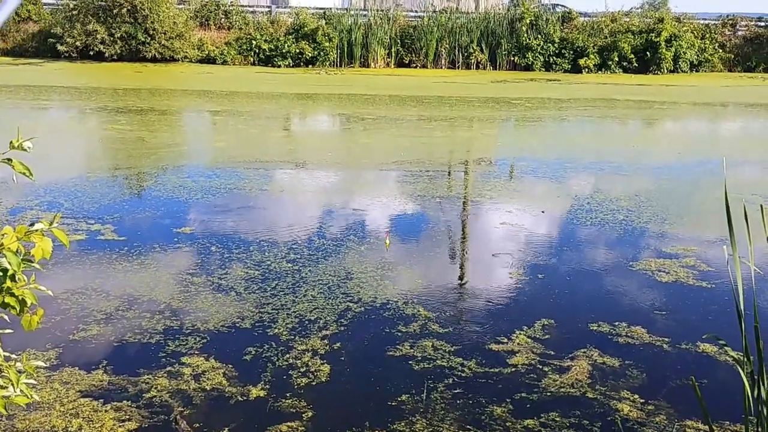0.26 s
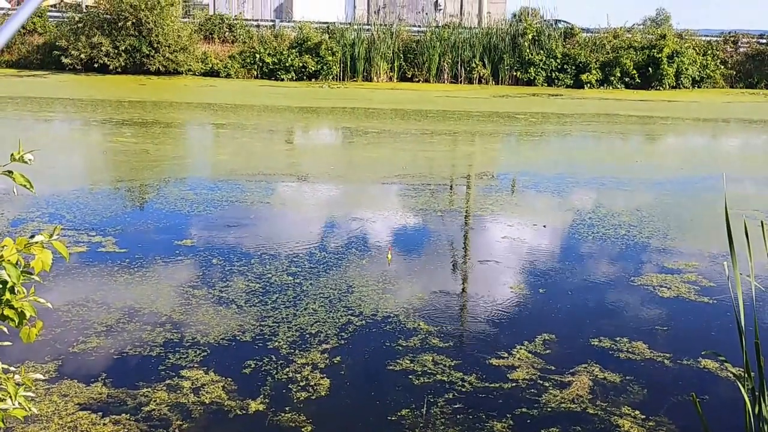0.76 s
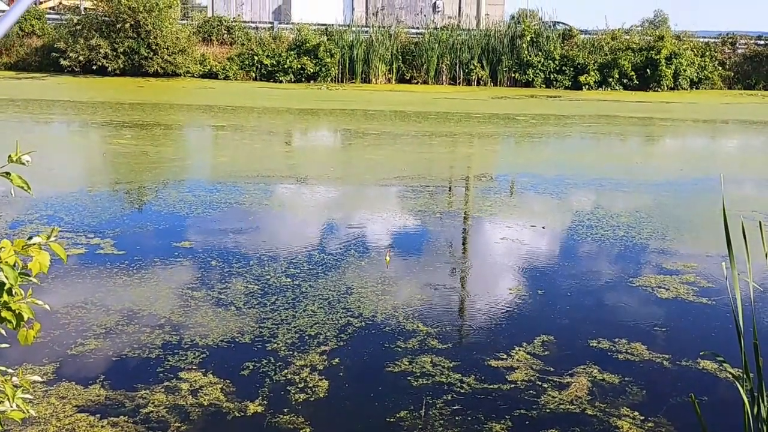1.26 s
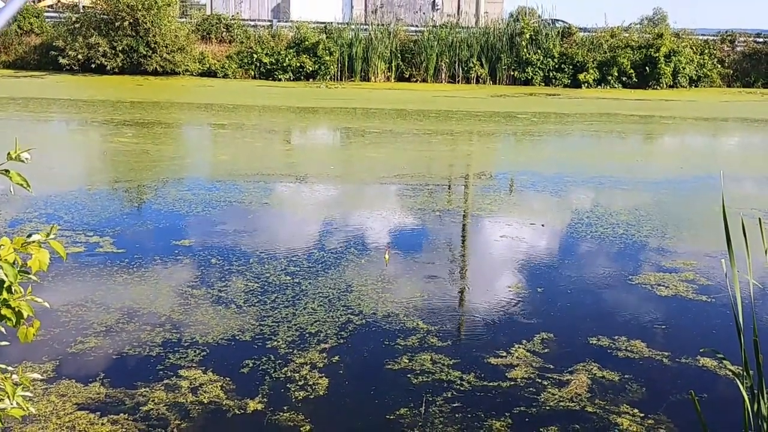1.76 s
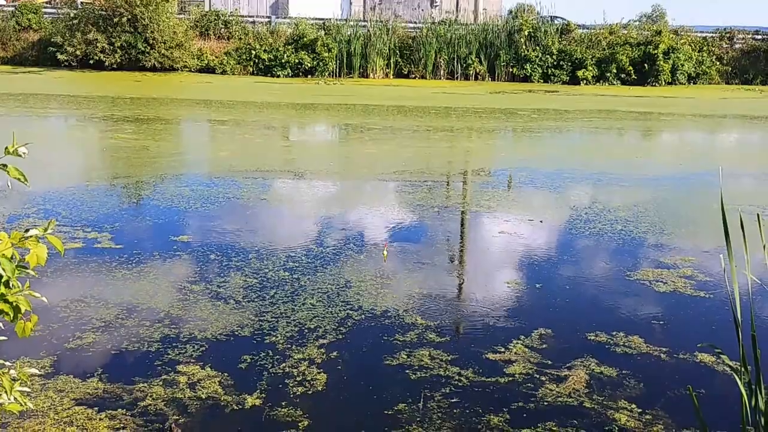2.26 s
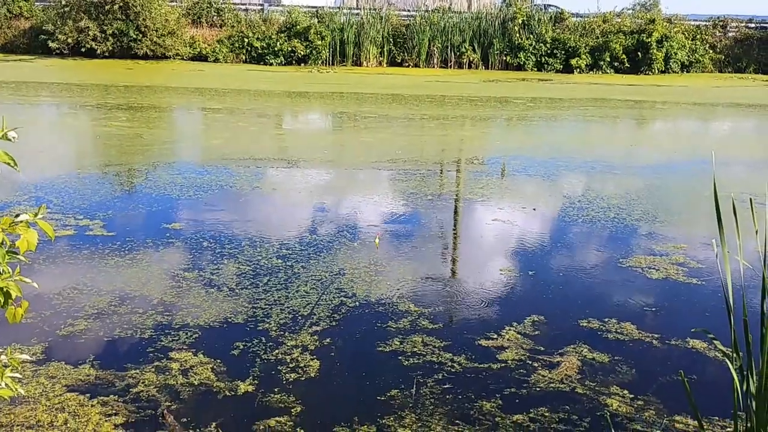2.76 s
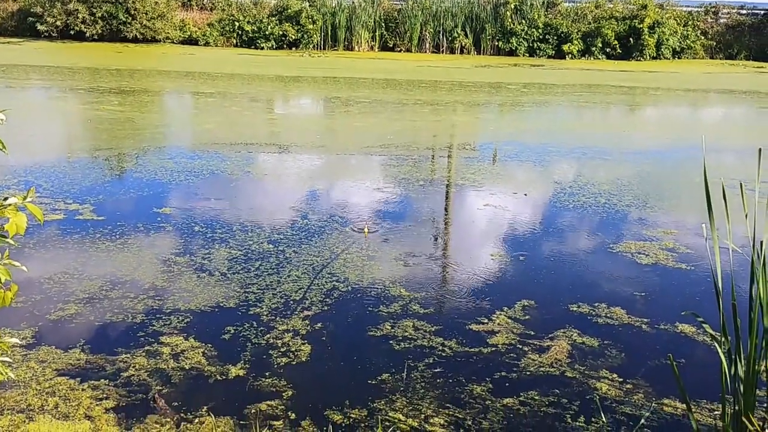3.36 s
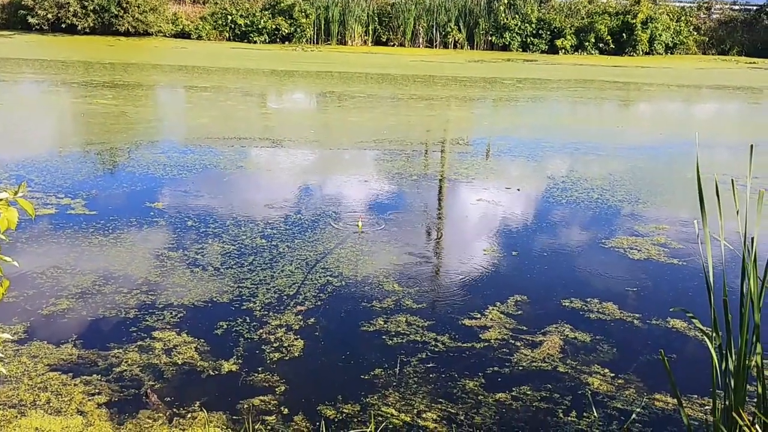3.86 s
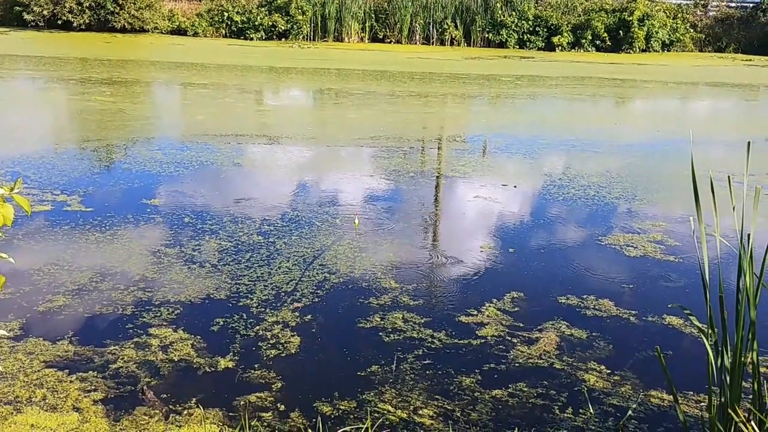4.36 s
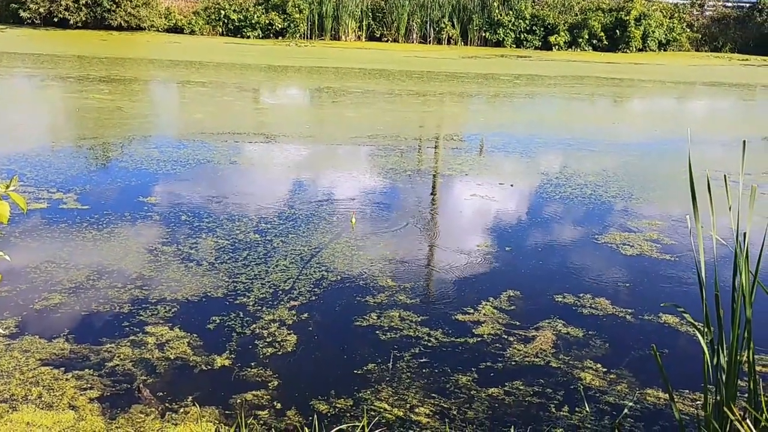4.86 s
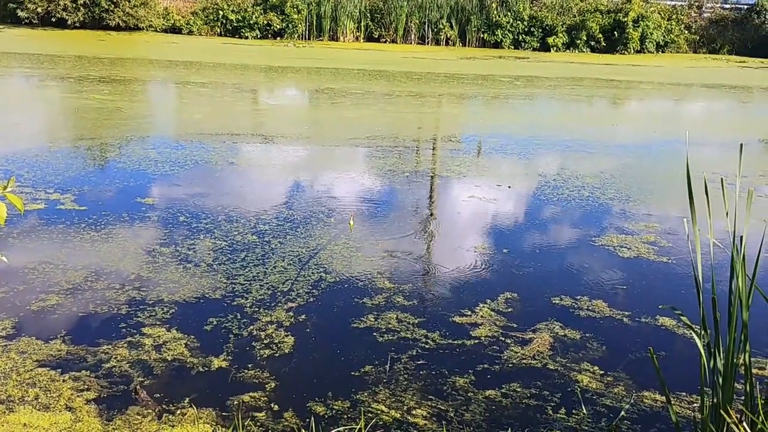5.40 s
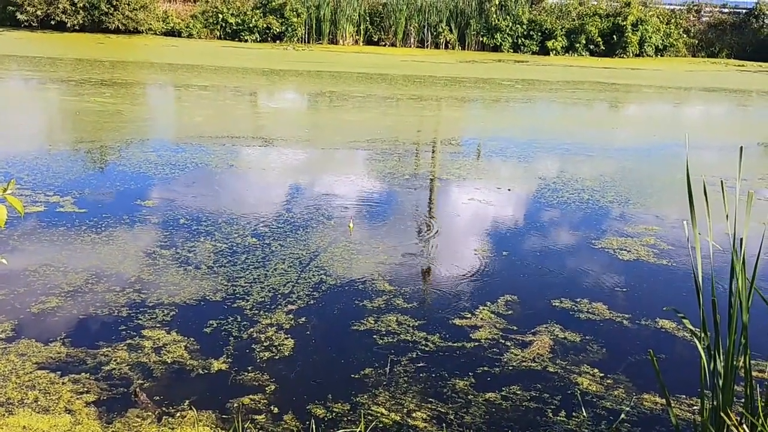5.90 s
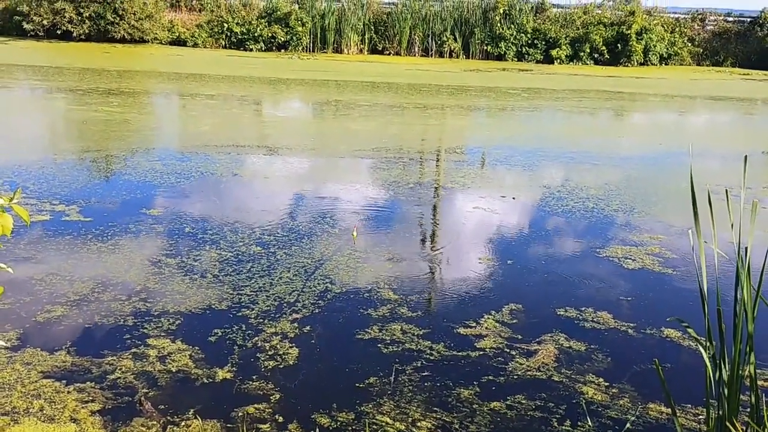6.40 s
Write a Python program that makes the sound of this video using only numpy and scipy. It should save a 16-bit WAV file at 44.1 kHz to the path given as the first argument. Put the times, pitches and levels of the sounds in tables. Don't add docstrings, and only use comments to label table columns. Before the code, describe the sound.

Steady low rumble and tyre roar of distant traffic across a pond, lorry engines humming, while a thin cicada buzz fades away and a bird chips.

```python
import sys
import numpy as np
from scipy import signal
from scipy.fft import rfft, irfft
from scipy.io import wavfile
from scipy.ndimage import uniform_filter1d

SR = 44100
rng = np.random.default_rng(int(sys.argv[2]) if len(sys.argv) > 2 else 0)


def materialize(psi):
    bounded = np.clip(np.atleast_2d(psi).T, -1, 1)
    quanta = np.round(bounded * 32767).astype(np.int16)
    wavfile.write(sys.argv[1], SR, quanta)


def amplitude_ratio(level_db):
    exponent = np.asarray(level_db, float) / 20
    return 10 ** exponent


N = 292821

# [t/s, tyre roar level/dB]
TRAFFIC = [(0, -56), (.15, -53.5), (.4, -55.5), (.95, -54.5), (1.5, -55), (1.9, -55.5), (2.07, -53.5),
           (2.5, -55), (2.6, -53), (3.05, -57), (3.4, -55.5), (4.1, -53.5), (4.33, -55.5), (4.75, -56.5),
           (5.1, -54.5), (5.5, -54.5), (6.1, -55.5), (6.64, -57.5)]
# [t/s, length/s, change of level/dB]
SURGES = [(0.09, 0.1, 2), (1.396, 0.32, 2), (2.192, .4, 0), (2.631, 0.17, 2.5), (2.895, 0.11, 1.5),
          (3.1, 0.23, -1), (3.9, 0.44, -2), (5.105, 0.078, 3), (5.39, 0.25, 2), (6.05, 0.41, 1.5),
          (6.64, 0.094, 9)]
# [f/Hz, level/dB per Hz]
RUMBLE = [(25, -45.5), (43, -28.5), (55, 5), (90, 6), (130, 5), (170, 0), (250, -7), (330, -19), (450, -43),
          (800, -110)]
# [f/Hz, level/dB per Hz]
ROAR = [(180, -20.5), (300, -2.5), (428, -11.5), (493, -8.5), (764, -9), (965, -12.5), (1940, -25.5),
        (2400, -29.5), (3100, -38.5), (4420, -72)]
# [f/Hz, level/dB per Hz]
HISS = [(1800, -14), (2600, -1), (3500, -1), (5000, -3), (6500, -7.5), (8400, -8.5), (9000, -11.5),
        (10400, -14.5), (12800, -11.5), (14500, -11), (15200, -6), (15700, -3)]
# [f/Hz, likeness/0..1]
LIKENESS = [(60, .99), (150, .95), (350, .87), (600, .78), (1100, .58), (1700, .48), (2300, .3),
            (3500, .12), (6000, .03)]
# [f/Hz, L-R level/dB]
LEAN = [(60, 5), (400, 5.2), (1000, 4.5), (2500, 3.9), (5000, 3.8), (9000, 3.5), (15000, 4.2)]
# [t/s, firing f/Hz, level/dB, exhaust boom: second order over first/dB]
CRUISER = [(0, 58.6, -35, 2.5), (.55, 59, -36.5, 5.5), (.98, 59.1, -36, -1.5), (1.14, 59.2, -33, -17),
           (1.33, 59.3, -37.5, 4.5), (1.75, 59.5, -33, -2.5), (2.148, 59.8, -30, -1),
           (2.68, 59.7, -34, -3.5), (3.201, 58.5, -41, -8)]
# [t/s, firing f/Hz, level/dB]
SHIFTER = [(3.25, 59, -41), (3.6, 61.88, -43), (3.96, 63.8, -37), (4.3, 68.14, -32), (4.7, 70.47, -34.5),
           (5.01, 70.56, -31), (5.2, 64.4, -37), (5.49, 54.9, -44.5), (5.65, 56, -45)]
# [t/s, firing f/Hz, level/dB]
CLIMBER = [(3.099, 135.8, -46.5), (3.22, 134.9, -38.5), (3.38, 130.9, -29.5), (3.6, 131.3, -28),
           (4.15, 134, -27.5), (4.3, 135.1, -31.5), (4.6, 137.8, -36), (4.789, 137.6, -33),
           (4.88, 135.5, -48)]
# [t/s, length/s, firing f/Hz at start,
# f/Hz at end, level/dB]
FAR_CARS = [(0.395, 1.8, 126, 135.2, -42), (0.955, 0.34, 88, 90.9, -43.5), (1.25, 1, 80.5, 78.8, -39.5),
            (1.799, 0.98, 93.5, 92.9, -42.5), (2.296, 0.94, 126, 132.2, -45),
            (2.496, 0.15, 270, 266.7, -49.5), (2.726, 0.053, 119.4, 117.6, -33),
            (2.974, .08, 118.3, 115.5, -35.5), (2.723, 0.11, 272, 283, -52),
            (3.396, 1.3, 80.5, 85.54, -40.5), (3.867, .83, 232, 236.8, -51), (4.7, 1.6, 90, 90.74, -47.5),
            (4.88, 0.38, 232, 235, -48.5), (5.017, .14, 140.9, 137.9, -34), (5.22, 0.77, 143.3, 145.1, -43),
            (5.43, 0.76, 232.5, 237, -51.5), (5.527, .6, 252.5, 256.7, -52.5), (5.752, .7, 76, 69.9, -45),
            (5.946, .7, 142, 135.7, -50), (6.097, 0.66, 88, 84.2, -43.5)]
# [t/s, hold/s, level/dB, belly resonance f/Hz, f/Hz above which tymbals oppose]
CICADA = [
    (0, .25, -65.5, 7490, 6400),
    (0.396, .2, -69, 7450, 6400),
    (0.968, 0.097, -72.5, 7480, 6400),
    (1.3, .14, -77.5, 7530, 6450),
    (1.75, 0.089, -72.5, 7370, 7950),
    (2.398, .15, -77.5, 7200, 8000),
    (2.82, .15, -84, 7220, 6800),
    (3.141, .25, -79.5, 7030, 7800),
    (3.554, .35, -80.5, 6450, 7800),
    (4.022, 0.074, -84, 6310, 7800),
]
# [t/s, clicks per second]
CLICKS = [(0, 190.3), (.7, 191.45), (1.5, 191.8), (3.05, 191.45), (3.5, 190.2), (4.2, 188)]
# [f/Hz, level/dB]
TYMBAL = [(4200, -36.5), (5000, -19), (5750, -6), (6300, -10), (7000, -9), (7900, -10), (8500, -18),
          (9200, -27.5), (10000, -43.5)]
# [f/Hz, loss/dB]
SHADE = [(5000, 12), (6300, 14.5), (7000, 20), (7450, 25), (8500, 18)]
# [t/s, level/dB, f/Hz, L-R level/dB, length/s]
CHIPS = [
    (.456, -65, 3720, 6, .035),
    (1.682, -65.5, 3580, 3.5, .032),
    (3.03, -68.5, 3680, 5, .033),
    (5.688, -66, 3650, 2, .034),
]
# [t/s, level/dB, f/Hz, L-R level/dB, length/s]
PEEPS = [
    (4.99, -79, 4300, 6, .08),
    (5.13, -79, 4250, 6, .1),
    (5.94, -75, 4500, 8, .018),
]
# [t/s, level/dB, f/Hz, L-R level/dB, length/s]
TICKS = [
    (2.379, -64, 3000, 5, .007),
    (3.365, -72, 4200, 5, .008),
    (3.43, -67, 6200, 2, .004),
    (3.431, -69, 4000, 2, .004),
    (4.036, -69, 7200, 10, .012),
    (4.188, -73, 7200, 10, .008),
    (3.17, -76, 7000, 6, .008),
]
# [t/s, level/dB, f/Hz, L-R level/dB, length/s]
BUMPS = [
    (2.56, -50, 550, 5.5, .05),
    (3.68, -49, 540, 5.5, .04),
    (5.075, -45, 520, 4.5, .055),
]
# [f/Hz, phase/rad]
BACK = [(60, .14), (130, .1), (250, .3), (400, .3), (800, .22), (1500, .17), (2500, .02)]

RUMBLE_DB, RUMBLE_FOLLOWS, RUMBLE_FADE_DB_PER_S = -45.5, 0.52, 0.23
LEAVES_DB, LEAVES_FADE_DB_PER_S = -82, 0.32
CLIMBER_SECOND_DB = -26
PASS_EDGE_DB, PASS_EDGE_SHARE = -4, 0.21
SWELL_DB_PER_S, SAG_DB_PER_S = 54, 34
RASP, RASP_PER_S = .1, .07
LAG = 21
LOW_CUT_HZ, EDGE_HZ = 35, 15745


def road():
    (roar_db,), _ = played(TRAFFIC)
    t = np.arange(N) / SR
    rumble_db = RUMBLE_DB + RUMBLE_FOLLOWS * (roar_db - roar_db.mean()) - RUMBLE_FADE_DB_PER_S * t
    for start, length, db in SURGES:
        rumble_db = rumble_db + db * np.exp(-(2 * (t - start) / length) ** 2)
    leaves_db = LEAVES_DB - LEAVES_FADE_DB_PER_S * t
    rumble = wash(RUMBLE, (155, 330), rumble_db, patchy_db=1.0, gusty_db=1.0, size=4096)
    roar = wash(ROAR, (400, 1500), roar_db, patchy_db=1.0, gusty_db=0.76, size=1024)
    hiss = wash(HISS, (9500, 15500), leaves_db, patchy_db=1.5, gusty_db=0.05, size=512)
    return rumble + roar + hiss


def wash(spectrum, band_hz, level_db, patchy_db, gusty_db, size):
    hz = np.fft.rfftfreq(size, 1 / SR)
    frames = 4 * N // size + 5
    a, b, c, d, patches = rng.standard_normal((frames, len(hz), 5)).T
    patches = uniform_filter1d(patches, size // 100, axis=0)
    patches = evened(uniform_filter1d(patches, size=6, axis=1))
    gusts = evened(uniform_filter1d(rng.standard_normal(frames), size=3))
    same = np.clip(read(LIKENESS, hz), 0, 1)[:, None]
    left = a + 1j * b
    right = same * left + np.sqrt(1 - same ** 2) * (c + 1j * d)
    weather_db = patchy_db * patches + gusty_db * gusts
    z = np.array([left, right]) * amplitude_ratio(read(spectrum, hz)[:, None] + weather_db)
    z = z * amplitude_ratio(np.array([.5, -.5])[:, None] * read(LEAN, hz))[:, :, None]
    power = abs(z.mean(0)) ** 2
    inside = (hz > band_hz[0]) & (hz < band_hz[1])
    share = np.sum(power[inside]) / np.sum(power)
    x = signal.istft(z, nperseg=size, noverlap=size - size // 4)[1][:, :N]
    return x / np.std(x.mean(0)) / np.sqrt(share) * amplitude_ratio(level_db)


def engine(rows, wobble=0.0041, flutter_db=0.6):
    (hz, *orders_db), gate = played(rows)
    turns = np.cumsum(hz * (1 + wobble * drift(size=1500))) / SR
    hum = np.zeros(N)
    for order, db in enumerate(orders_db, 1):
        level = amplitude_ratio(db + flutter_db * drift(size=900))
        hum += level * np.sin(2 * np.pi * (order * turns + rng.random()))
    return ports(np.sqrt(2) * hum * gate, 5.2)


def far_car(start, length, from_hz, to_hz, db):
    u = np.array([0, PASS_EDGE_SHARE, 1 - PASS_EDGE_SHARE, 1])
    pass_db = db + PASS_EDGE_DB * np.array([1, 0, 0, 1])
    rows = np.transpose([start + length * u, from_hz + (to_hz - from_hz) * u, pass_db])
    return engine(rows, wobble=.006, flutter_db=2.5)


def cicada(width_hz=150, peak_db=12, turn_hz=220, rasp_hz=1500):
    level, rate, belly_hz, flip_hz, rasp = swells()
    end = len(level)
    turns = np.cumsum(rate * (1 + 0.00075 * drift(size=600)[:end])) / SR
    buzz = np.zeros(end)
    slow = slice(None, None, 32)
    for k in range(22, 52):
        hz = k * rate[slow]
        belly_width = width_hz * (1 + 4 * rasp[slow])
        belly = 1 / (1 + 2j * (hz - belly_hz[slow]) / belly_width)
        opposed = 1 / (1 + np.exp((flip_hz[slow] - hz) / turn_hz))
        second = (-1) ** k * np.exp(1j * np.pi * opposed)
        line = amplitude_ratio(read(TYMBAL, hz)) * (1 + amplitude_ratio(peak_db) * belly) * (1 + .85 * second)
        buzz += (np.repeat(line, 32)[:end] * np.exp(2j * np.pi * k * turns)).real
    buzz = buzz / np.sqrt(uniform_filter1d(buzz ** 2, size=4000) + 1e-20)
    keep = np.exp(-np.pi * rasp_hz / SR)
    shake = signal.lfilter([1], [1, -keep], rng.standard_normal((2, end)))
    shake = signal.lfilter([1], [1, -keep], shake)
    puffs = 1 + .5 * np.cos(4 * np.pi * turns)
    ring = 2 * np.pi * np.cumsum(belly_hz) / SR
    noise = evened(puffs * (shake[0] * np.cos(ring) + shake[1] * np.sin(ring)))
    song = np.sqrt(1 - rasp) * buzz + np.sqrt(rasp) * noise
    left = np.pad(song * level, (0, N - end)) * amplitude_ratio(4.0 + 1.0 * drift(size=1300))
    shade = amplitude_ratio(-read(SHADE, np.fft.rfftfreq(N, 1 / SR)))
    return np.array([left, irfft(rfft(left) * shade, N)])


def swells():
    start, hold, db, belly_hz, flip_hz = np.transpose(CICADA)
    stop = start + hold
    t = np.arange(round((stop[-1] + .1) * SR)) / SR
    away_db = np.maximum(SWELL_DB_PER_S * (start[:, None] - t), SAG_DB_PER_S * (t - stop[:, None]))
    level = amplitude_ratio((db[:, None] - np.maximum(away_db, 0)).max(0))
    level = level * np.clip((t[-1] - t) / .05, 0, 1)
    edges = np.ravel([start, stop], "F")
    rate = np.interp(t, *np.transpose(CLICKS))
    belly = np.interp(t, edges, np.repeat(belly_hz, 2))
    flip = np.interp(t, edges, np.repeat(flip_hz, 2))
    return level, rate, belly, flip, np.clip(RASP + RASP_PER_S * t, 0, 1)


def blips(rows, width, glide, echo):
    out = np.zeros((2, N))
    for s, db, hz, lean_db, length in rows:
        count, first = round(length * SR), round(s * SR)
        u = np.arange(count) / count
        shake = uniform_filter1d(rng.standard_normal(6000), size=24)[:count] * 5
        pitch = hz * (1 + glide * (1 - abs(4 * u - 1.8)) + width * shake)
        blip = amplitude_ratio(db) * np.sqrt(np.sin(np.pi * u)) * np.sin(2 * np.pi * np.cumsum(pitch) / SR)
        out[:, first:first + count] += ports(blip, lean_db)
    return out + echo * np.roll(out, 480, axis=1)


def birds():
    return blips(CHIPS, .075, .1, .7) + blips(PEEPS, .08, .015, .7)


def knocks():
    return blips(TICKS, .08, .01, .2) + blips(BUMPS, .45, .15, .6)


def ports(x, lean_db):
    sides = amplitude_ratio(np.array([[.5], [-.5]]) * lean_db)
    return x * sides / sides.mean()


def played(rows):
    s, *columns = np.transpose(rows)
    t = np.arange(N) / SR
    gate = np.clip(np.minimum(t - s[0] + .05, s[-1] + .05 - t) / .05, 0, 1)
    return [np.interp(t, s, c) for c in columns], gate


def read(points, hz):
    f, value = np.transpose(points)
    return np.interp(np.log(hz + 1), np.log(f + 1), value)


def drift(size):
    return evened(uniform_filter1d(uniform_filter1d(rng.standard_normal(N), size), size))


def evened(x):
    return x / np.sqrt(np.mean(x ** 2) + 1e-20)


def scene():
    cruiser = engine([(s, hz, db, db + boom_db) for s, hz, db, boom_db in CRUISER], flutter_db=1.5)
    climber = engine([(s, hz, db, db + CLIMBER_SECOND_DB) for s, hz, db in CLIMBER], flutter_db=1.5)
    shifter = engine(SHIFTER, flutter_db=0.5)
    far = sum(far_car(*row) for row in FAR_CARS)
    return road() + cruiser + climber + shifter + far + cicada() + birds() + knocks()


def low_pass(x):
    return signal.sosfilt(signal.butter(12, 16920, fs=SR, output="sos"), x)


def record(dry):
    dry = np.pad(dry, ((0, 0), (2000, 2000)), "reflect")
    hz = np.fft.rfftfreq(dry.shape[1], 1 / SR)
    trail = np.exp(1j * (read(BACK, hz) - 2 * np.pi * hz * LAG / SR))
    band = (hz < EDGE_HZ) * hz ** 2 / np.sqrt(hz ** 4 + LOW_CUT_HZ ** 4)
    delays = np.array([np.ones_like(trail), trail])
    heard = irfft(rfft(dry) * delays * band, dry.shape[1])[:, 2000:-2000]
    i = np.arange(N)
    soft_ends = np.clip(np.minimum(i + 60, N - i) / 120, 0, 1)
    return low_pass(heard * soft_ends)


dry = scene()
out = record(dry)
materialize(out)
```